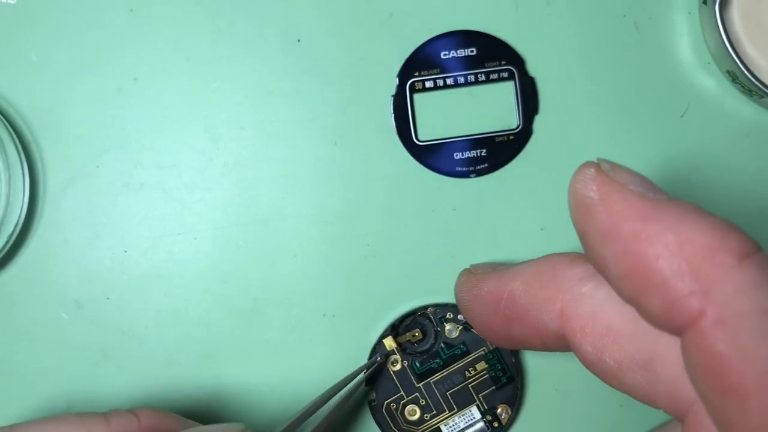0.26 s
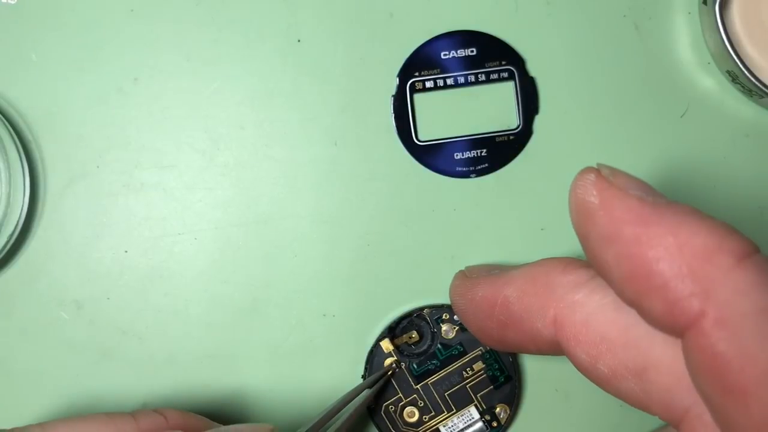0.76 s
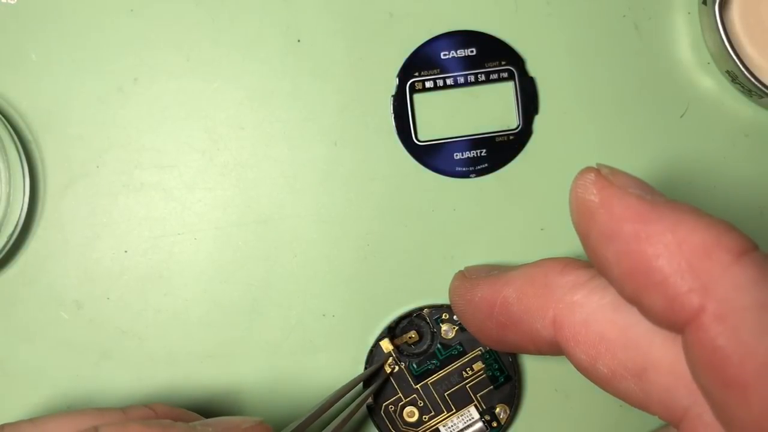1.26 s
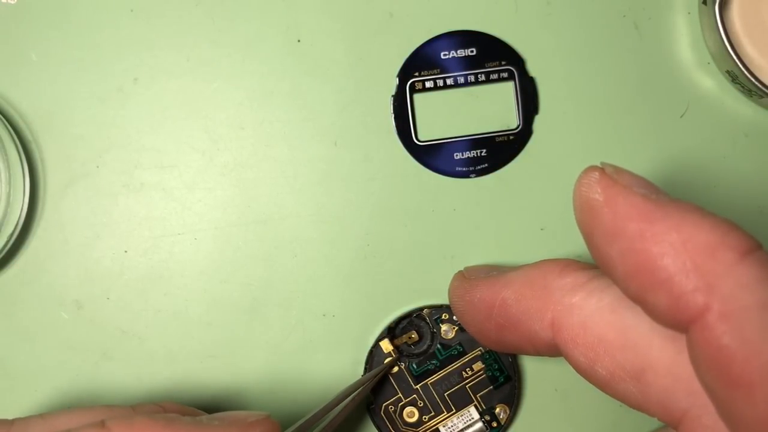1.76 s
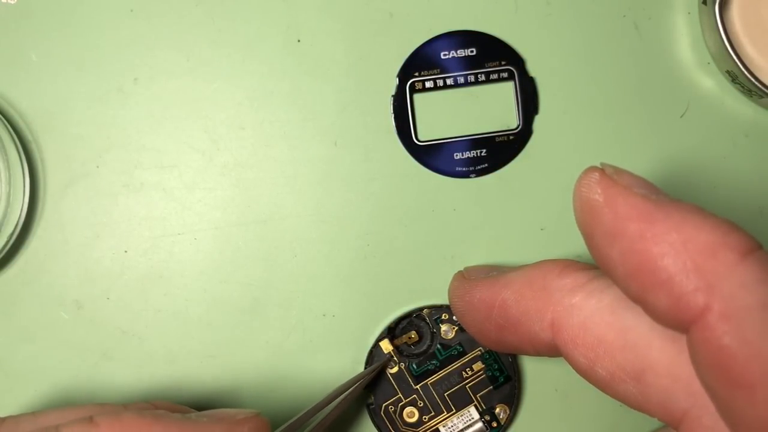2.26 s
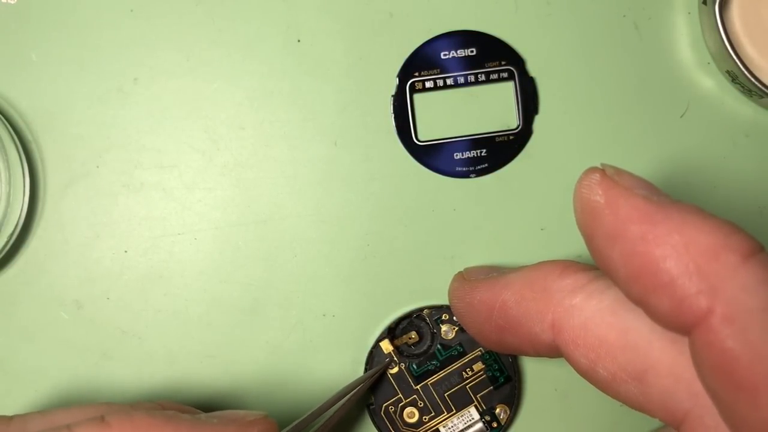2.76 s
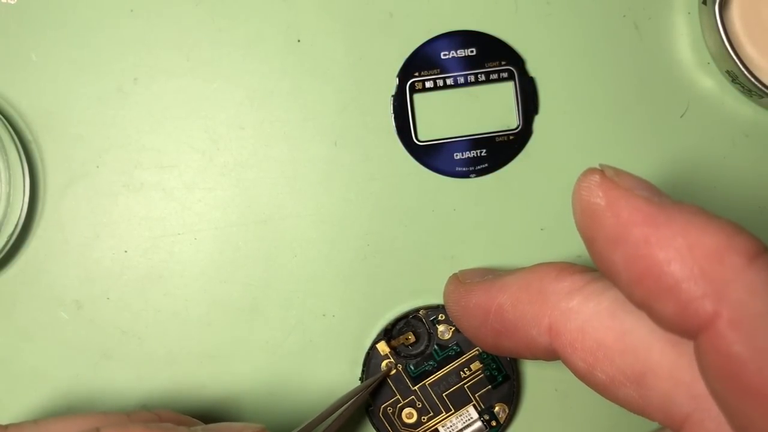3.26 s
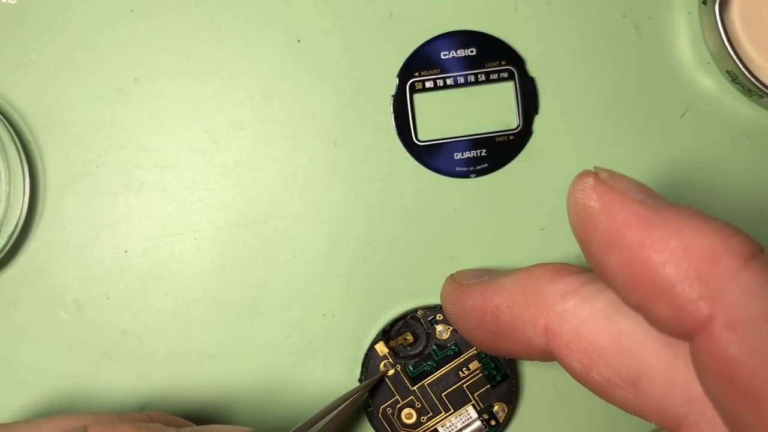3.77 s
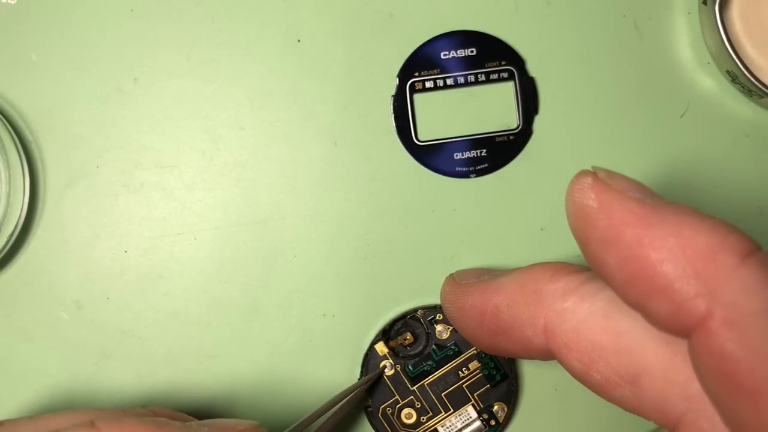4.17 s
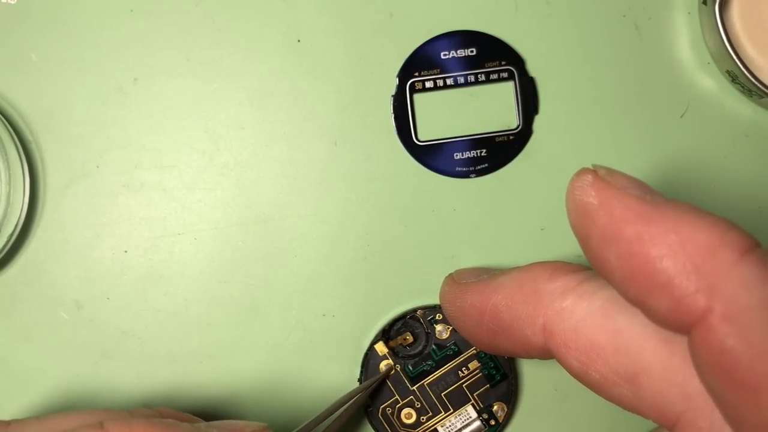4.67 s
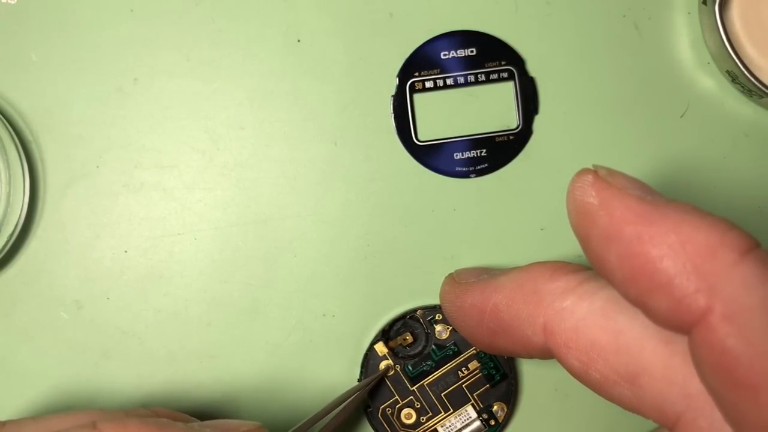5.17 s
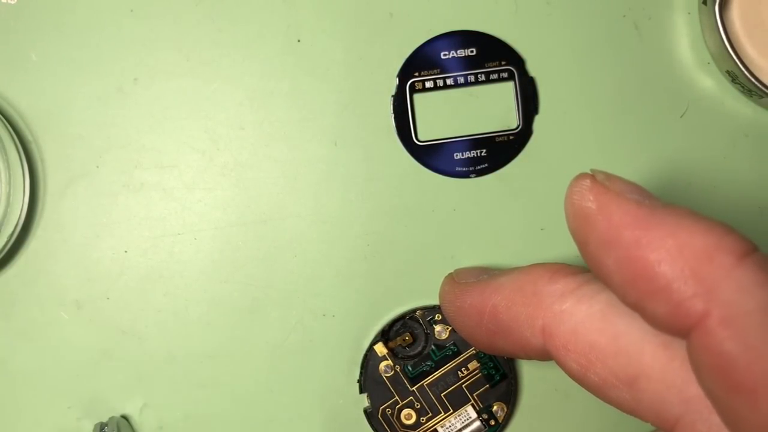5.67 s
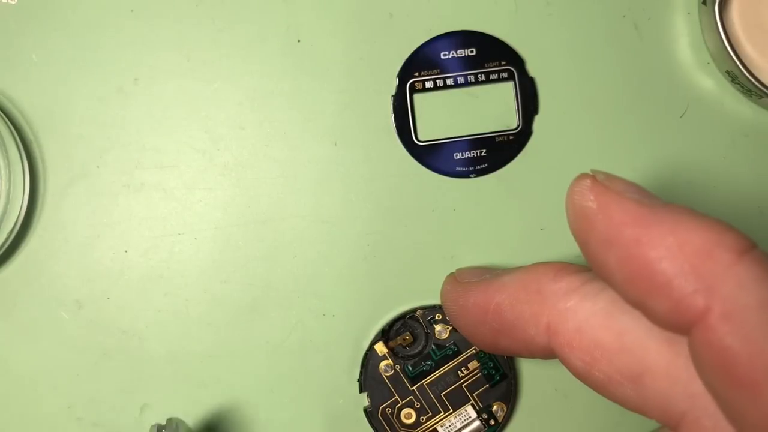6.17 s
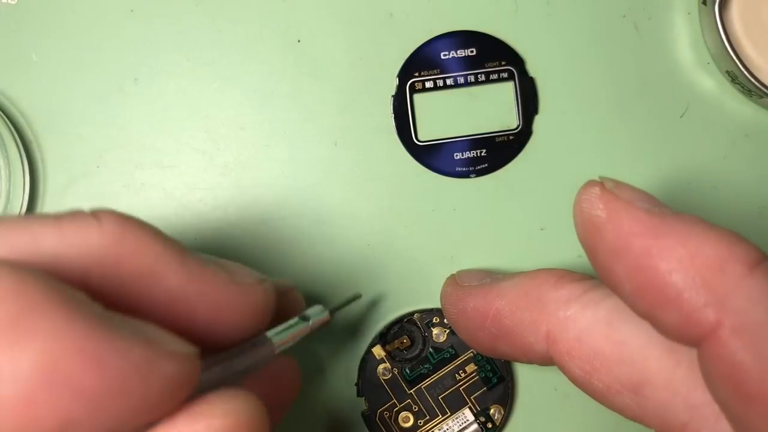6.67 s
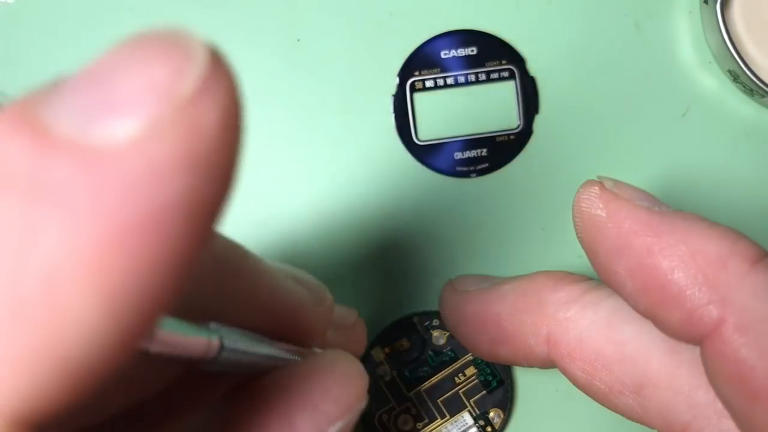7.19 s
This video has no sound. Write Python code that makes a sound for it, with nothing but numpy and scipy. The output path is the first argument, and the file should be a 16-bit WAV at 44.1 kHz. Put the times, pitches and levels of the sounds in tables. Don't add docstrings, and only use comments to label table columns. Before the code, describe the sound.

Delicate watch repair heard by a close small microphone: isolated tiny metallic ticks with long near-silent gaps, then a couple of dry snaps and soft finger slides on steel. Tweezers land with a short, hard, bright clatter and quick rebounds, loudest by far. Afterwards a screwdriver shaft snaps and clicks lightly against the bench. Dry, small room with faint hum and hiss.

```python
import sys
import numpy as np
from scipy import signal
from scipy.fft import rfft, irfft, next_fast_len
from scipy.io import wavfile
from scipy.ndimage import map_coordinates

SR = 44100
rng = np.random.default_rng(int(sys.argv[2]) if len(sys.argv) > 2 else 0)


def voltage_ratio(level):
    return 10 ** (np.asarray(level, float) / 20)


def store_pcm(level_fs):
    pcm = np.round(np.clip(level_fs, -1, 1) * 32767).astype(np.int16)
    wavfile.write(sys.argv[1], SR, np.atleast_2d(pcm).T)


N = 327920
T = np.arange(N) / SR
TOP_HZ, EDGE_HZ = 15850, 16600
HISS_DB, RUMBLE_DB, DRONE_DB = -73.5, -69.8, -72.5

# t/s, peak level/dB, brightest f/Hz
TIP_TICKS = [(0.1136, -38.5, 8700), (0.1206, -53, 6500), (0.125, -45, 8530), (0.132, -50, 9870),
             (0.1344, -49, 6450), (0.1405, -48, 6340), (0.1434, -48, 5110), (0.896, -48.5, 5430),
             (0.935, -54, 4910), (1.0636, -52.5, 6400), (2.0335, -58, 5300), (2.0386, -46.5, 9300),
             (2.042, -60, 5400), (2.0445, -54, 9200), (2.0513, -53, 5400), (2.0595, -55, 9000),
             (2.8605, -51, 5500), (3.0904, -42.5, 9320), (3.1353, -52.5, 4520), (3.3148, -46.5, 5500),
             (3.347, -49, 5300), (3.5342, -51, 5500), (4.3987, -54, 5400), (5.225, -55.5, 9300)]
# t/s, peak level/dB, brightest f/Hz
BOARD_PRESSES = [
    (4.3357, -48.5, 4400),
    (4.3645, -51, 4520),
    (4.7465, -56.5, 4300),
]
# t/s, peak level/dB, brightest f/Hz
SCREW_PINGS = [
    (3.371, -56, 4300),
    (4.5023, -56, 4340),
    (6.2881, -59, 8700),
]
# t/s, peak level/dB, brightest f/Hz, bench boom level/dB
DRY_SNAPS = [
    (2.886, -56, 5500, -30),
    (2.935, -56, 5500, -30),
    (5.3833, -35.5, 9000, -14),
    (5.391, -47, 3500, -20),
    (5.4335, -42, 4000, -6),
    (6.1785, -35, 9000, -21),
    (6.6905, -22.5, 15000, -32),
]
# t/s, peak level/dB, brightest f/Hz
GRIP_CLICKS = [
    (5.4026, -53, 2860),
    (5.5581, -32, 7050),
    (5.7889, -35, 12700),
]
# t/s, peak level/dB, brightest f/Hz, bench boom level/dB
FIRST_TOUCH = [
    (5.951, -22.5, 5170, -6),
    (5.962, -36, 5060, -7),
    (6.002, -49, 3200, -19),
]
# t/s, peak level/dB, brightest f/Hz, bench boom level/dB
FLAT_LANDINGS = [
    (6.0204, -13, 5370, -4.5),
    (6.0254, -22.5, 3000, -7),
    (6.1164, -26.5, 2800, -3.5),
    (6.203, -52, 5000, 4.5),
]
# t/s, peak level/dB, brightest f/Hz, bench boom level/dB
BOUNCES = [(6.0215, -19, 3020, -27), (6.0454, -20.5, 9460, -9.5), (6.0696, -24, 9510, -16),
           (6.0814, -23.5, 2780, -9), (6.098, -25, 5070, -23), (6.1104, -25, 3740, -6.5),
           (6.1266, -25.5, 5070, -23), (6.1334, -33, 5060, -13), (6.1408, -28, 2400, -7.5),
           (6.158, -37.5, 2590, -14), (6.1624, -34, 5380, -6.5)]
# t/s, peak level/dB, brightest f/Hz
EDGE_GRAZES = [
    (5.977, -52, 9000),
    (6.0185, -44, 6000),
    (6.039, -29, 12000),
    (6.2236, -28.5, 15400),
    (6.2478, -44, 13200),
    (6.253, -37.5, 15500),
    (6.938, -49, 5000),
]
# t/s, peak level/dB, brightest f/Hz
SHAFT_CLICKS = [
    (6.315, -44.5, 13300),
    (6.4934, -57, 9340),
    (6.5, -47, 3100),
    (6.5139, -25, 10100),
    (6.5464, -46, 10100),
    (6.7625, -47, 12300),
    (6.8867, -52, 6000),
    (6.9533, -24.5, 10050),
    (6.961, -46, 6580),
]
# t/s, peak level/dB, brightest f/Hz
SHAFT_NUDGES = [
    (6.5187, -29, 6350),
    (6.5396, -33, 8430),
    (6.7832, -44.5, 11900),
    (6.8363, -52, 7990),
    (6.849, -48, 9900),
]

# f/Hz, width/Hz, level/dB
BOARD_MODES = [(4300, 190, -3), (5500, 1170, -0.5), (6540, 530, -3), (8700, 550, -2.5), (9900, 900, -9),
               (12700, 660, -6), (15000, 1200, -23)]
# f/Hz, width/Hz, level/dB
ARM_MODES = [(2100, 400, -16), (3270, 420, -6), (5170, 140, -7), (7000, 73, -4), (9800, 280, -18),
             (12700, 330, -1.5), (15400, 130, -16.5), (16200, 130, -14.5)]
# f/Hz, width/Hz, level/dB
SLAP_MODES = [(3080, 400, -2.5), (4300, 250, -17), (5450, 520, -0.5), (6920, 240, -13.5),
              (8950, 630, -25.5), (12300, 260, -17.5), (14200, 240, -20)]
# f/Hz, width/Hz, level/dB
SHAFT_MODES = [(2800, 450, -21.5), (4350, 350, -21), (6240, 240, -7.5), (8420, 420, -8), (10100, 350, -14),
               (12500, 750, -5), (15660, 950, -3)]
# f/Hz, level/dB, t60/s
BENCH_BOOM = [(177.6, -0.5, 0.082), (248, -12, 0.091), (328, -11, 0.054), (378, -12.5, 0.041),
              (555, -16.5, 0.054)]
# f/Hz, level/dB, t60/s
BENCH_RAP = [(746, -12, 0.041), (944, -7, 0.044), (1178, -11.5, 0.034), (1480, -2, 0.021),
             (1600, -4, 0.017), (1740, -7, 0.031), (1963, -5.5, 0.0215), (2277, -7.5, .02),
             (2695, -8, 0.0149)]
# f/Hz, level/dB, t60/s, struck t/s, stopped t/s
ARM_RINGS = [(2800, -41.5, .5, 6.048, 6.122), (5313, -40, 0.46, 6.042, 6.085),
             (8689, -37, .05, 6.040, 6.07), (9475, -36.5, .25, 6.042, 6.113),
             (11200, -38.5, 0.046, 6.040, 6.07), (12050, -37.5, 0.078, 6.040, 6.12),
             (14030, -35.5, .03, 6.040, 6.06), (14795, -33.5, .11, 6.041, 6.12),
             (3097, -39.5, 0.087, 6.069, 6.11), (6002, -36, .08, 6.070, 6.1),
             (11300, -44.5, 0.25, 6.072, 6.13), (14100, -38, .08, 6.073, 6.11),
             (9520, -42, .2, 6.073, 6.11), (15800, -45, .05, 6.179, 6.2)]

# start t/s, length/s, level/dB, centre f/Hz
STEEL_SKIDS = [(.118, 0.035, -63, 7500), (.148, 0.13, -69.5, 4730), (5.376, .054, -65, 11000),
               (5.435, 0.056, -66.5, 6000), (5.565, .035, -73, 12500), (5.795, .035, -74, 12500),
               (5.959, 0.057, -64, 4800), (6.021, .03, -42, 2190), (6.114, .064, -56, 3000),
               (6.181, .022, -59, 9000), (6.309, 0.089, -65.5, 9000), (6.392, .013, -56.5, 9000),
               (6.458, .013, -50.5, 10000), (6.525, 0.028, -64, 7000), (6.589, .024, -64.5, 8000),
               (6.827, 0.089, -69, 10000), (6.952, .013, -52.5, 5000)]
# start t/s, length/s, level/dB, centre f/Hz
FINGER_RUBS = [
    (5.538, 0.021, -60, 9000),
    (6.039, 0.1, -46, 2800),
    (6.203, 0.025, -53, 6000),
    (6.231, .029, -58.5, 7000),
    (6.428, 0.028, -58.5, 7000),
    (6.481, 0.023, -69, 8000),
    (6.906, 0.036, -64.5, 5000),
]
# start t/s, length/s, level/dB, centre f/Hz
ARM_SQUEAKS = [
    (5.382, 0.084, -63, 3100),
    (5.659, 0.031, -60.5, 3090),
    (6.329, 0.1, -65.5, 2600),
]
# start t/s, length/s, level/dB, centre f/Hz
FINGER_SLIDES = [
    (5.44, 0.042, -67, 14000),
    (5.598, 0.1, -59.5, 13500),
    (5.727, 0.07, -63.5, 13500),
    (6.752, 0.036, -69, 11000),
]
# t/s, level/dB
WRIST_SHOVE = [
    (5.36, -76),
    (5.368, -88),
    (5.386, -54.5),
    (5.408, -75),
    (5.434, -57.5),
    (5.52, -78),
]

# f/Hz, t60/s
WALL_DECAY = [(200, 0.21), (2000, 0.32), (12000, 0.076)]
# f/Hz, level/dB per Hz
HISS_SPECTRUM = [(590, -25.5), (1000, -4), (3020, -7), (5400, -10), (9680, -12.5), (10600, -16.5),
                 (12200, -7), (15700, -11)]
# f/Hz, level/dB per Hz
RUMBLE_SPECTRUM = [(74, -34), (125, -5), (160, -2), (330, -6), (450, -11), (1600, -22), (3300, -50),
                   (6000, -120)]
# f/Hz, level/dB
MAINS_HUM = [(100, -71)]


def unit(x):
    return x / np.sqrt(np.mean(x ** 2) + 1e-20)


def along(points, hz):
    f, value = np.transpose(points)
    return np.interp(np.log(hz + 1), np.log(f + 1), value)


def wobble(rate_hz, size=N):
    knots = rng.standard_normal(int(size * rate_hz / SR) + 4)
    return map_coordinates(knots, [T[:size] * rate_hz])


def filtered(x, response):
    m = next_fast_len(x.shape[-1] + 4096)
    spectrum = rfft(x, m) * response(np.fft.rfftfreq(m, 1 / SR))
    return irfft(spectrum, m)[..., :x.shape[-1]]


def resonance(f, hz, width_hz):
    return 1j * f * width_hz / (hz * hz - f * f + 1j * f * width_hz)


def contacts(events, body, t60, rap_db, spread, bare_db, boom_db=-25, shift=0.026, vary_db=2.0,
             spot_db=-30, spot_hz=450, cut_hz=1200, follow=0):
    out = np.zeros(N + SR)
    t = np.arange(6144) / SR
    for start_s, peak_db, bright_hz, *heavy_db in events:
        crackle = rng.standard_normal(len(t)) * voltage_ratio(-60 * t / t60)
        burst = crackle + 7 * (t == 0)
        deviation = rng.standard_normal((len(body), 2))

        def response(f):
            modes = 0
            for k, (hz, width_hz, db) in enumerate(body):
                gain = (-1) ** k * voltage_ratio(db + vary_db * deviation[k, 0])
                modes = modes + gain * resonance(f, hz * (1 + shift * deviation[k, 1]), width_hz)
            highpass = (1j * f / (1j * f + cut_hz)) ** 2
            broad = (modes + voltage_ratio(bare_db)) * resonance(f, bright_hz, spread * bright_hz) * highpass
            return broad + voltage_ratio(spot_db) * resonance(f, bright_hz, spot_hz)

        tick = filtered(burst, response)
        weight_db = heavy_db[0] if heavy_db else boom_db
        knock = voltage_ratio(weight_db + 4.5) * struck(BENCH_BOOM, t)
        knock += voltage_ratio(rap_db + 2 + follow * (weight_db - boom_db)) * struck(BENCH_RAP, t)
        onset = 1 - np.exp(-t / 0.00066)
        out[round(start_s * SR):][:len(t)] += voltage_ratio(peak_db) * (tick / np.abs(tick).max() + onset * knock)
    return out[:N]


def struck(modes, t):
    deviation = [2, .009] * rng.standard_normal((len(modes), 2))  # dB, pitch ratio
    out = np.zeros(len(t))
    for (hz, db, t60), (extra_db, detune) in zip(modes, deviation):
        out += voltage_ratio(db + extra_db - 60 * t / t60) * np.sin(2 * np.pi * hz * (1 + detune) * t)
    return out


def ringing():
    out = np.zeros(N)
    for hz, db, t60, struck_s, stopped_s in ARM_RINGS:
        t = np.maximum(T - struck_s, 0)
        choke = voltage_ratio(-60 * np.maximum(T - stopped_s, 0) / .02)
        chatter_db = 2.4 * wobble(120)
        onset = 1 - np.exp(-t / 0.0012)
        out += voltage_ratio(db + chatter_db - 60 * t / t60) * onset * choke * np.sin(2 * np.pi * hz * t)
    return out


def rubbing(strokes, spread, swell, colour=1.1, edge=0.18):
    out = np.zeros(N)
    for start_s, length_s, db, centre_hz in strokes:
        span = round(start_s * SR) + np.arange(round(length_s * SR))
        slip_db = 3.3 * wobble(700, size=8192) + 1.2 * wobble(90, size=8192)
        grit = (rng.standard_normal(8192) * voltage_ratio(slip_db))[:len(span)]

        def response(f):
            arms = 1 + colour * sum(voltage_ratio(g) * abs(resonance(f, hz, width)) for hz, width, g in ARM_MODES)
            band = resonance(f, centre_hz, spread * centre_hz)
            return arms * band * (f / (f + 1500)) ** 2 * (f < TOP_HZ)

        envelope = np.interp(T[span] - start_s, [0, swell * length_s, length_s], [edge, 1, 1.5 * edge])
        out[span] += voltage_ratio(db) * envelope * unit(filtered(grit, response))
    return out


def shove():
    s, db = np.transpose(WRIST_SHOVE)
    noise = rng.standard_normal(N)
    rumble = filtered(noise, lambda f: resonance(f, 280, 100) + .4 * resonance(f, 400, 250))
    return voltage_ratio(np.interp(T, s, db, -120, -120)) * unit(rumble)


def walls(x):
    hz, t, z = signal.stft(rng.standard_normal(SR // 2), SR, nperseg=256)
    decay = voltage_ratio(-60 * t / along(WALL_DECAY, hz)[:, None])
    tail = signal.istft(z * decay, SR, nperseg=256)[1]
    return signal.fftconvolve(np.pad(x, (150, 0)), tail / np.linalg.norm(tail))[:N]


def room_tone():
    hiss = unit(filtered(rng.standard_normal(N), lambda f: voltage_ratio(along(HISS_SPECTRUM, f)) * (f < TOP_HZ)))
    rumble = unit(filtered(rng.standard_normal(N), lambda f: voltage_ratio(along(RUMBLE_SPECTRUM, f))))
    drone = unit(filtered(rng.standard_normal(N), lambda f: resonance(f, 57.5, 22) ** 2))
    out = voltage_ratio(HISS_DB + 0.21 * wobble(4.6)) * hiss
    out += voltage_ratio(RUMBLE_DB + 0.26 * wobble(1.0)) * rumble
    out += voltage_ratio(DRONE_DB) * drone
    for hz, db in MAINS_HUM:
        level = np.sqrt(2) * voltage_ratio(db + 1.6 * wobble(7))
        out += level * np.sin(2 * np.pi * hz * T + .15 * wobble(4))
    return out


def scene():
    board = dict(spread=1.0, bare_db=-24, shift=0.015, vary_db=0.5, spot_db=1, cut_hz=4200)
    bench = dict(spread=0.48, bare_db=-5, vary_db=4.0, spot_db=-1.5)
    shaft = dict(spread=5.2, bare_db=-11, shift=0.0087, vary_db=-1.0, spot_db=-1, cut_hz=1200)

    tools = contacts(TIP_TICKS, BOARD_MODES, t60=0.008, rap_db=-24.5, boom_db=-18, **board)
    tools += contacts(BOARD_PRESSES, BOARD_MODES, t60=0.0078, rap_db=-2.5, boom_db=-29, **board)
    tools += contacts(SCREW_PINGS, BOARD_MODES, t60=0.0047, rap_db=-26, spread=.3, bare_db=-26,
                      vary_db=-3.0, spot_db=12, spot_hz=130, cut_hz=3000)
    tools += contacts(DRY_SNAPS, BOARD_MODES, t60=0.0086, rap_db=-38, follow=0.94, spread=0.88,
                      bare_db=19.0, cut_hz=3100)
    tools += contacts(GRIP_CLICKS, ARM_MODES, t60=.017, rap_db=-22.5, boom_db=-29, spread=1.5,
                      bare_db=-24.0, shift=0.0069, vary_db=0.1, spot_db=-7.5, cut_hz=580)

    tools += contacts(FIRST_TOUCH, SLAP_MODES, t60=0.0054, rap_db=-18, **bench)
    tools += contacts(FLAT_LANDINGS, SLAP_MODES, t60=0.0086, rap_db=-2, **bench)
    tools += contacts(BOUNCES, SLAP_MODES, t60=.009, rap_db=-11.5, **bench)
    tools += contacts(EDGE_GRAZES, SLAP_MODES, t60=.0105, rap_db=-25.5, boom_db=-23, **bench)

    tools += contacts(SHAFT_CLICKS, SHAFT_MODES, t60=0.02, rap_db=-42, boom_db=-29.5, **shaft)
    tools += contacts(SHAFT_NUDGES, SHAFT_MODES, t60=0.015, rap_db=-24, boom_db=-25, **shaft)

    tools += ringing()
    tools += rubbing(STEEL_SKIDS, spread=1.9, swell=.17)
    tools += rubbing(FINGER_RUBS, spread=2.1, swell=.65, edge=.12)
    tools += rubbing(ARM_SQUEAKS, spread=0.35, swell=0.28)
    tools += rubbing(FINGER_SLIDES, spread=0.99, swell=.55, colour=2.2, edge=.25)
    tools += shove()

    small = filtered(tools, lambda f: (1j * f / (1j * f + 120)) ** 4)
    return (small + voltage_ratio(-20.0) * walls(small) + room_tone())[None]


def roll_off(x):
    return signal.sosfilt(signal.butter(12, 17150, fs=SR, output="sos"), x)


def record(dry):
    edges_hz = [TOP_HZ, TOP_HZ + 150, EDGE_HZ, EDGE_HZ + 300]
    mix = filtered(dry, lambda f: np.interp(f, edges_hz, [1, .35, 0.38, 0]))
    return roll_off(mix)


dry = scene()
out = record(dry)
store_pcm(out)
```